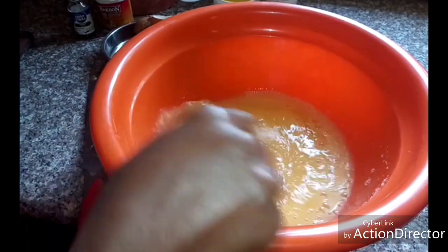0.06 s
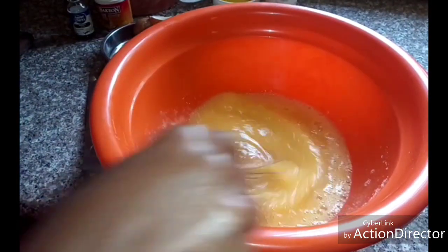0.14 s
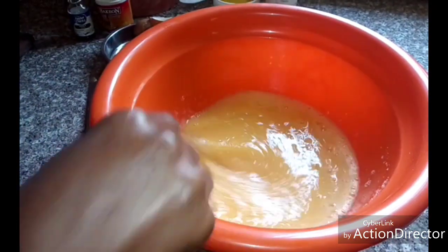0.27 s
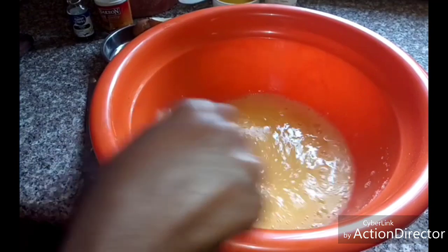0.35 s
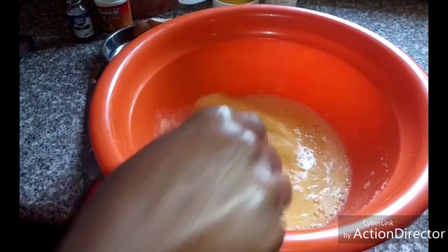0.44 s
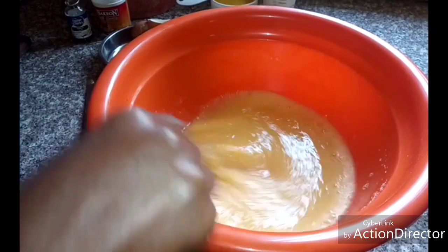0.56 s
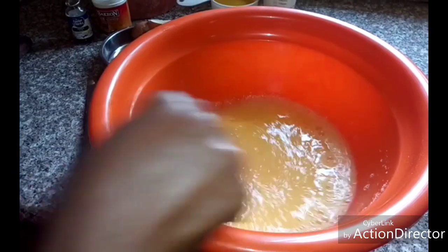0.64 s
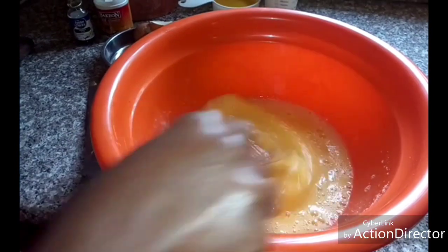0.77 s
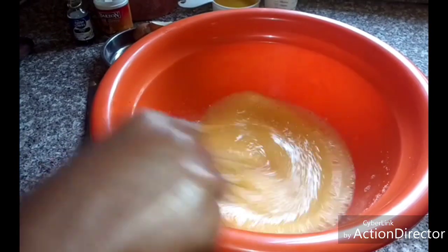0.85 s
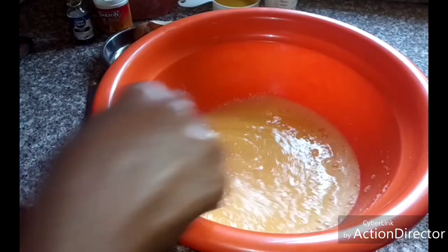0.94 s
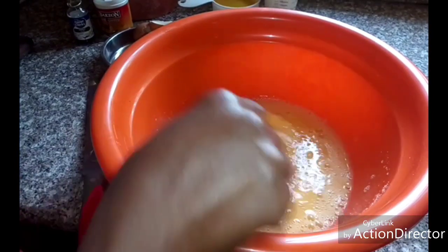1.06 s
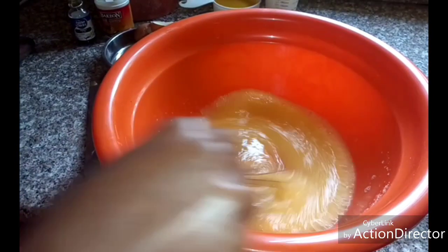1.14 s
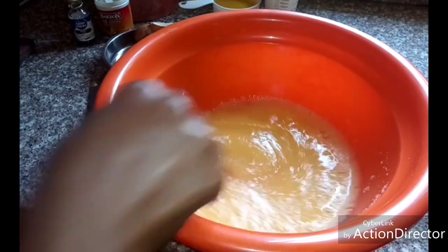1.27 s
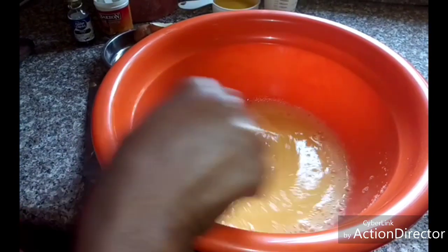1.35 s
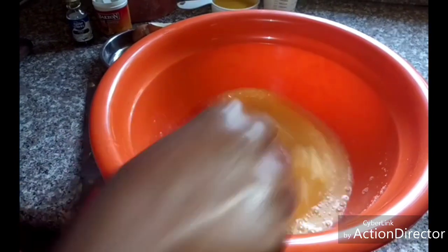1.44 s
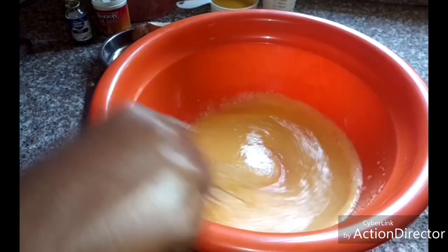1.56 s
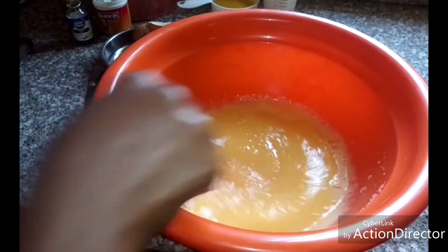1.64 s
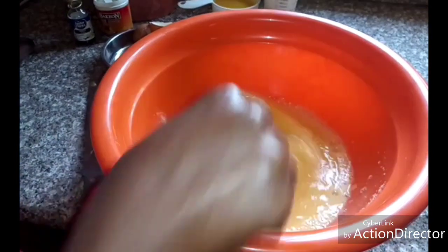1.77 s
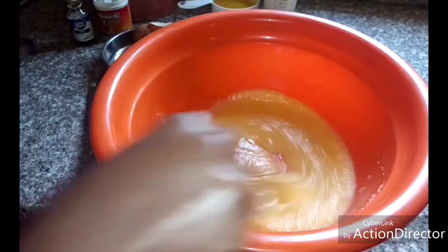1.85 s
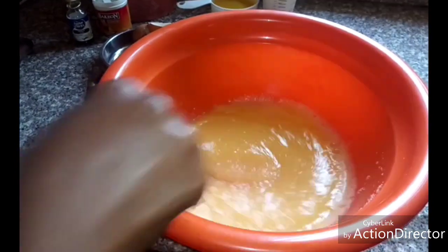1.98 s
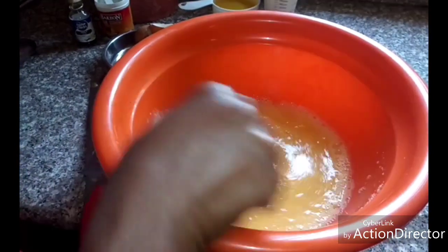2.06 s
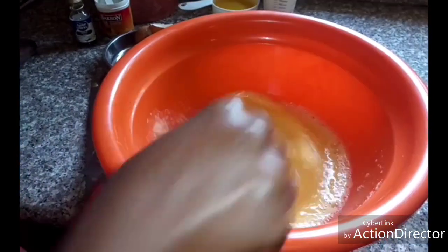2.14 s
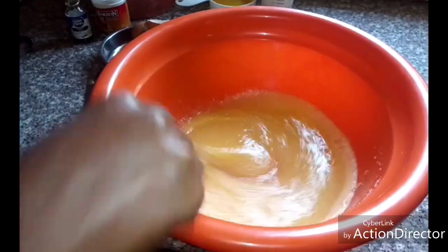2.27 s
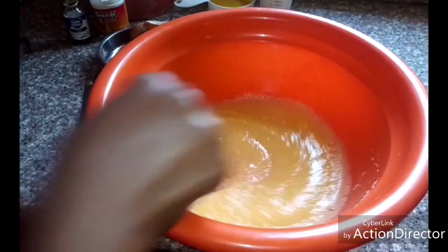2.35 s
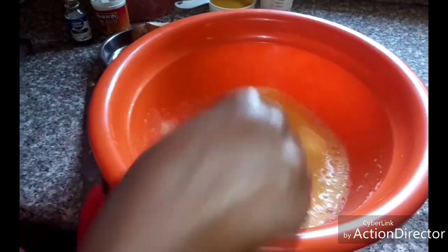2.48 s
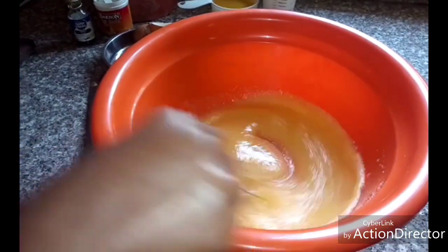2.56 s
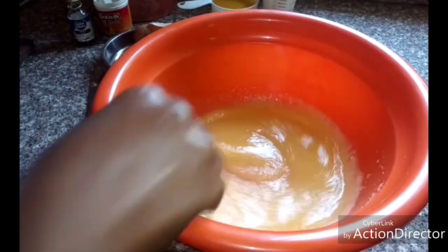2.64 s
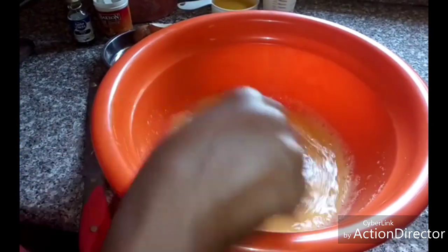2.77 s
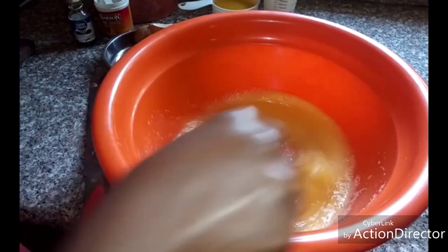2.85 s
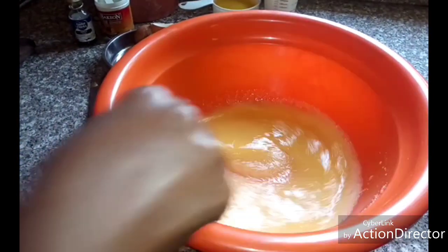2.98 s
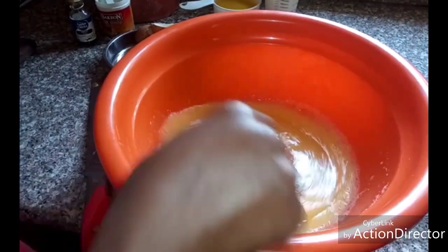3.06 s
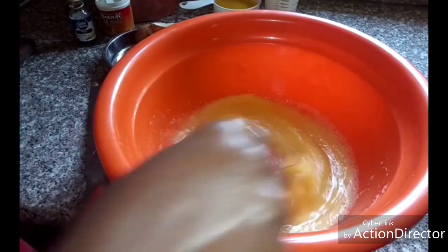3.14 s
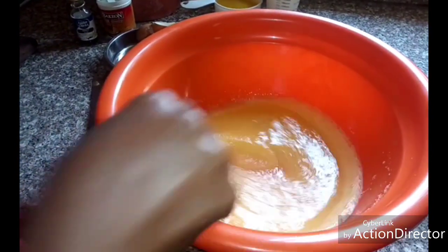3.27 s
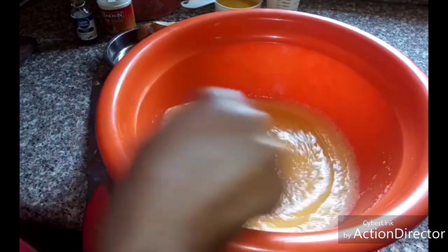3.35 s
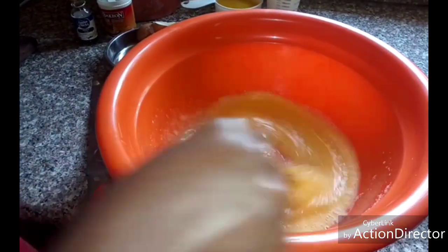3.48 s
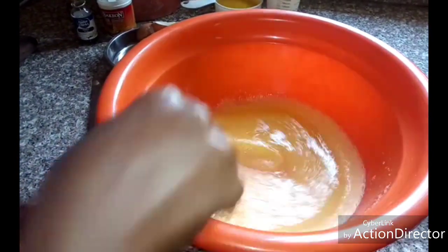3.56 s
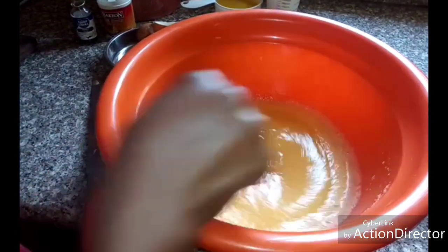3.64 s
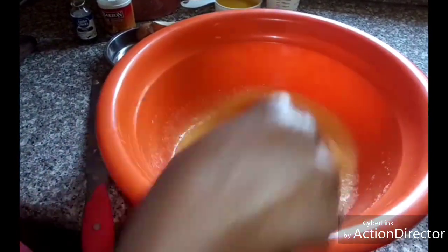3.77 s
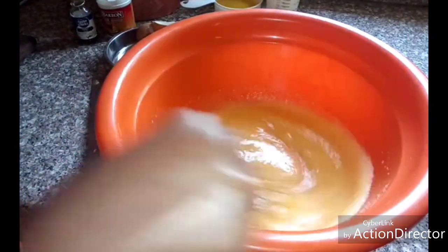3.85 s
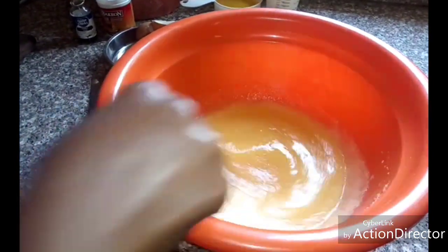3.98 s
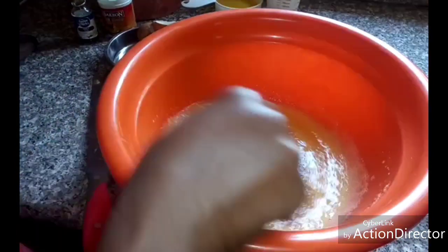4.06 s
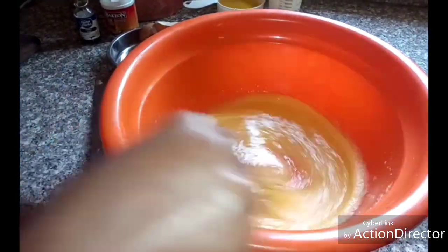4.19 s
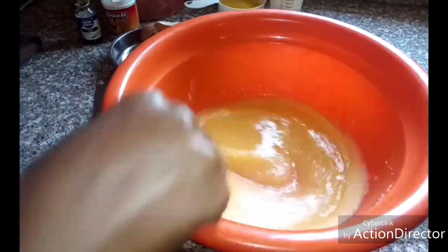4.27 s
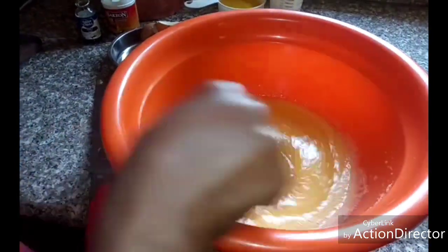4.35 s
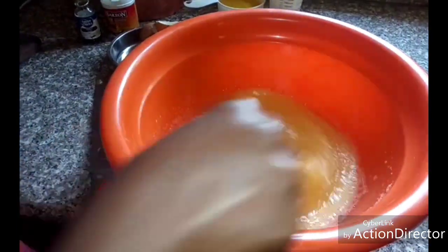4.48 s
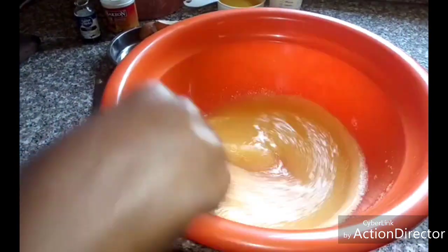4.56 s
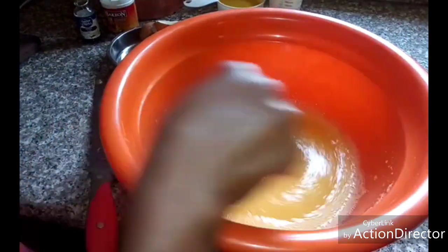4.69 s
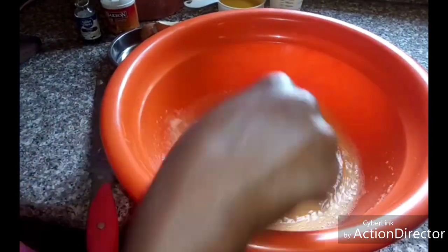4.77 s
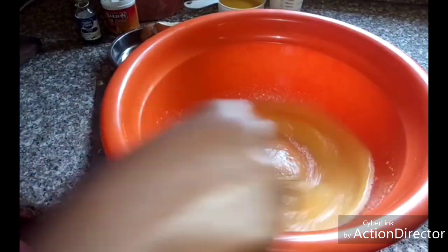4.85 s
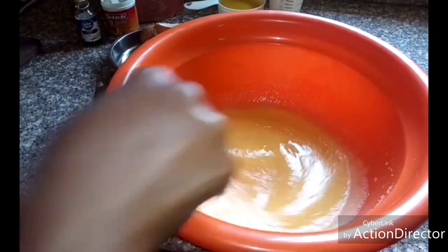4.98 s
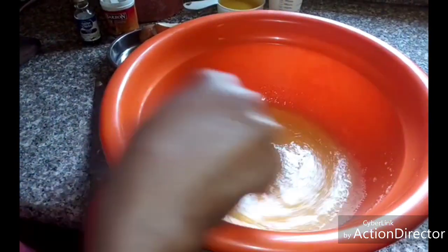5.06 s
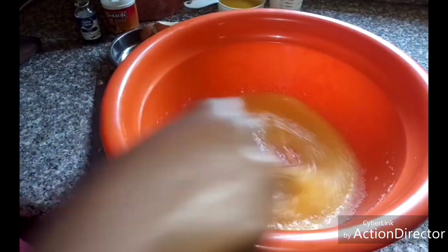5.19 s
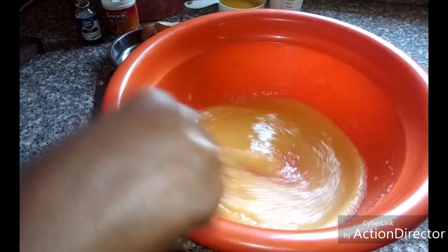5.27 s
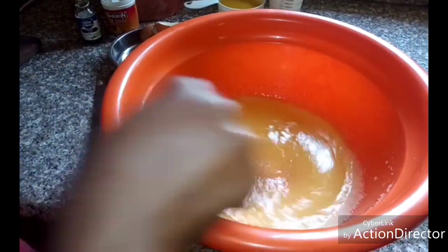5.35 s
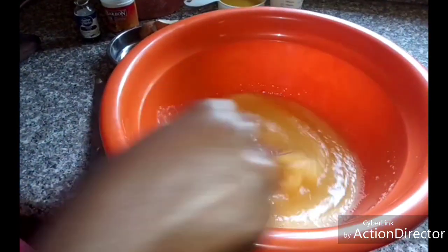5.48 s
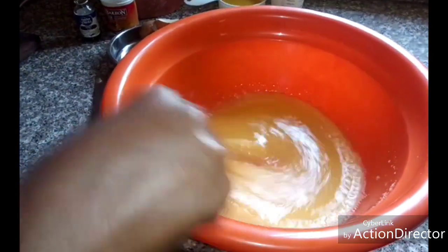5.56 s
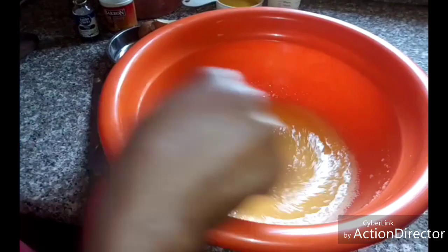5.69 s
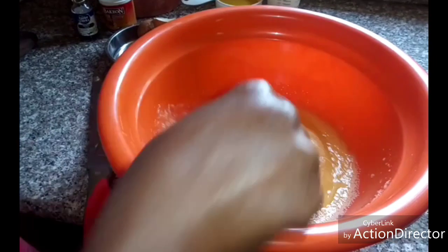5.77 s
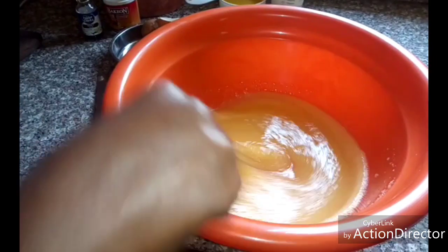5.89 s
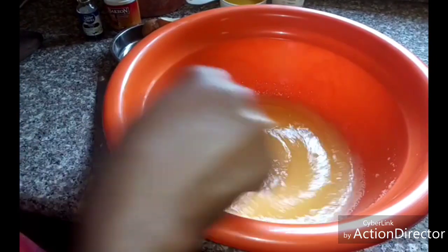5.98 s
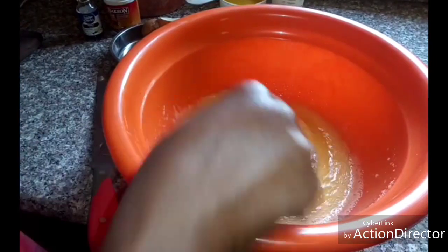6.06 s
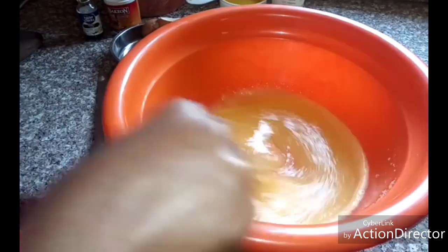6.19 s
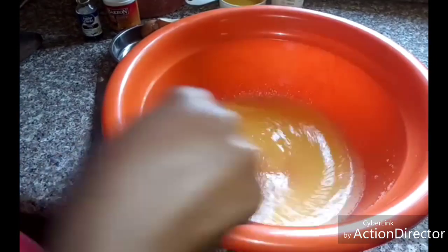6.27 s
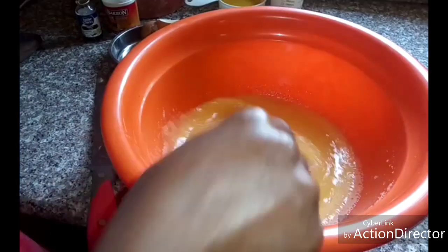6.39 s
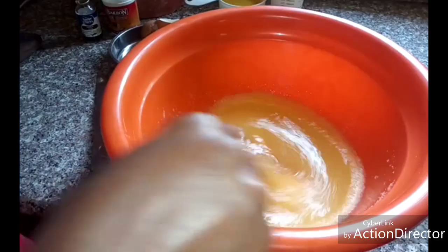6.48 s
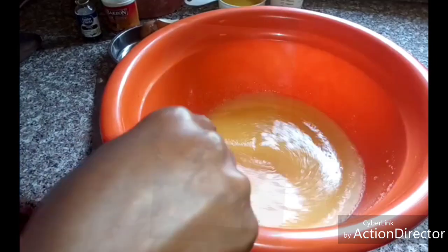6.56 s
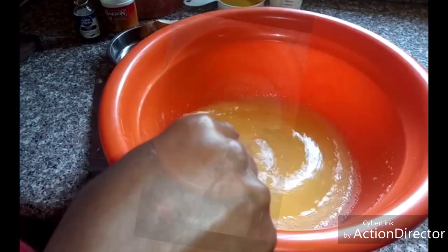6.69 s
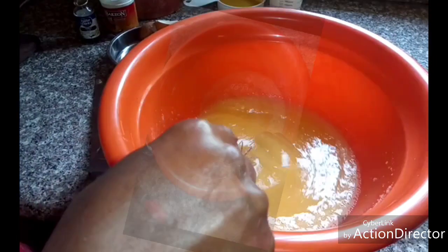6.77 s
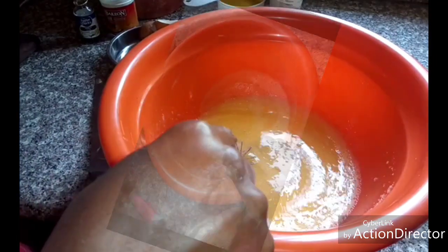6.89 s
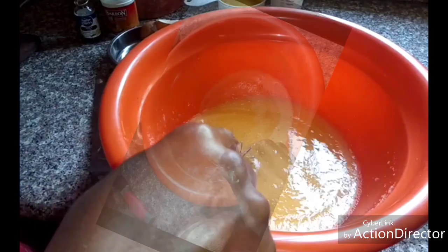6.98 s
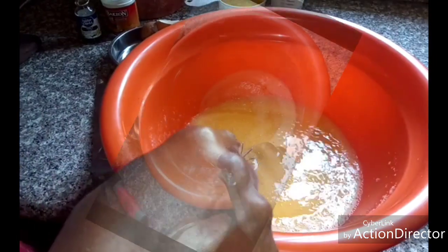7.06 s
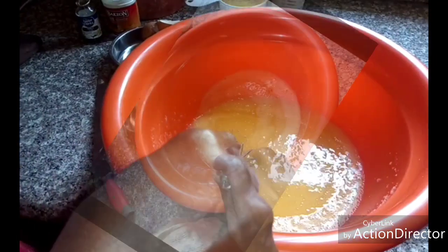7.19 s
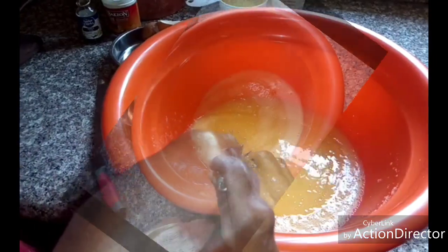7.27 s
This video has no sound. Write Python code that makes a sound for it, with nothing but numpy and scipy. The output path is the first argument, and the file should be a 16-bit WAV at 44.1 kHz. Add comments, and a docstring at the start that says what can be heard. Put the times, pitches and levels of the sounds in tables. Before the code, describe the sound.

Close, dry-sounding whisking in a small kitchen. Wires slap and skid around a plastic bowl in quick uneven rounds, about three per second, with hollow clacks, crunchy sugar rasp, liquid splats and light metallic ticking. The bowl thuds and shuffles on the counter. After more than six seconds it cuts off, and faint birds and a dull stand bump are heard in the hush.

```python
"""Wet knocks of a wire whisk on a plastic bowl, beating eggs and sugar close to a small microphone, then a stop.
Knocks are damped tones, bowl modes and noise bursts; dragged sugar grit is filtered clicks; wires tick in thin treble.
The bowl rocks on a stone counter as low noise; a small kitchen rings behind in feedback delays.
In the quiet after, far birds cheep (gliding narrow bands) and something bumps the microphone's stand (low swings)."""
import sys
import numpy as np
from scipy import signal
from scipy.fft import rfft, irfft, next_fast_len
from scipy.io import wavfile

SR = 44100
rng = np.random.default_rng(int(sys.argv[2]) if len(sys.argv) > 2 else 0)


def log_audio(samples):
    """Write samples as a 16-bit WAV file to the path given in sys.argv[1]."""
    # one column per channel
    frames = np.atleast_2d(samples).T
    # limit to full scale, then quantise
    limited = np.clip(frames, -1, 1)
    pcm = np.round(limited * 32767).astype(np.int16)
    wavfile.write(sys.argv[1], SR, pcm)


def decibels_to_gain(level_db):
    """Convert a level in decibels to a linear amplitude gain (20 dB per decade)."""
    exponent = np.asarray(level_db, float) / 20
    return 10 ** exponent


N = 323253

# whisk on wall: (time [s], relative level [dB], strongest ring [Hz], second ring [Hz], bright crack [dB])
KNOCKS = [(0.003, -27, 4580, 3320, -29.5), (0.0118, -29, 1650.0, 1070, -26), (0.0632, -13, 1780, 3200, -24),
          (0.0924, -13, 1830.0, 2720, -36), (0.1091, -26, 1800, 3170, -47), (0.1167, -19.5, 1770, 830, -28),
          (0.132, -35, 1780, 2700, -32), (0.1732, -30.5, 1153, 2170, -55),
          (0.194, -29.5, 2090, 1200.0, -48.0), (0.2225, -22, 2177, 3230, -31),
          (0.245, -22.5, 3210.0, 2230, -35), (0.282, -27.5, 3670.0, 2400, -20.5),
          (0.3167, -21.5, 1794, 2290, -22), (0.3498, -16, 2080, 1600, -39), (0.3645, -25, 1650, 2180, -23),
          (0.3908, -19, 1970, 2580, -31), (0.3983, -23, 1805, 3120, -21), (0.447, -13.5, 1015, 2780, -18.5),
          (0.5337, -24, 2080.0, 3500, -34), (0.597, -37, 3700, 5500, -26), (0.6428, -25.5, 2150, 3410, -20),
          (0.6527, -45, 4110.0, 3580, -19.5), (0.6896, -20, 1763, 3740, -37),
          (0.7023, -11, 1728, 3220, -52), (0.716, -27, 1815, 1000.0, -43), (0.762, -15.5, 3130, 1710, -26),
          (0.8026, -21, 2120, 2735, -40), (0.8563, -26, 1517, 2670, -47), (0.871, -30, 2190, 3500, -42),
          (0.8856, -23, 2256, 1640, -29), (0.907, -29, 3300, 2210, -30), (0.966, -28, 4790, 2140, -15.5),
          (1.0137, -15.5, 1800, 2094, -42), (1.022, -23, 2800, 1800, -40), (1.04, -13.5, 1914, 1092, -27),
          (1.062, -21.5, 1795, 3510, -46), (1.2053, -21, 4470, 1150.0, -28),
          (1.2398, -19, 1323, 3560.0, -29), (1.315, -21, 3390, 3810, -22), (1.4022, -17, 1957, 4480, -19),
          (1.4356, -24, 1937, 3780, -39.0), (1.4978, -22, 2785, 3840, -38),
          (1.5242, -22, 2160.0, 1532, -40), (1.5359, -21, 2156, 1430, -27),
          (1.6091, -26, 2480.0, 3810, -31), (1.6274, -22, 1655, 1150.0, -19.5),
          (1.6631, -14, 3960, 4770, -16), (1.6749, -14.5, 2150.0, 3263, -54),
          (1.6878, -29, 2240.0, 3610.0, -19), (1.7503, -18, 4440.0, 2800, -28),
          (1.7762, -21, 2650, 1640, -33), (1.786, -13, 3150, 2254, -21), (1.8662, -25, 2230.0, 3487, -35.0),
          (1.9569, -27, 2170.0, 3300, -24), (1.9824, -19.5, 2103, 4480, -28),
          (2.0197, -23, 3830.0, 1053, -23), (2.0608, -13.5, 2120, 2640.0, -34),
          (2.079, -17.5, 2560, 1064, -40), (2.1078, -16.5, 1890, 4430, -15),
          (2.133, -21, 4200.0, 1078, -27), (2.1508, -20, 4570.0, 3170, -16), (2.18, -24, 3110, 2050, -20),
          (2.2118, -26, 3570, 2070, -31), (2.2501, -17.5, 1582, 4180, -24), (2.348, -25.5, 2670, 3900, -19),
          (2.3606, -17.5, 2140, 2765, -18), (2.3962, -19, 4000, 1138, -24),
          (2.4362, -10.5, 2740, 1738, -18.5), (2.5003, -18.5, 3350.0, 2097, -26),
          (2.5488, -22, 2130, 1140, -38), (2.5788, -41, 2200, 3850.0, -23), (2.5923, -22, 2305, 3700, -30),
          (2.6194, -24, 1620, 2240, -26), (2.657, -16.5, 2206, 2766, -15), (2.7008, -22.5, 3310, 2200, -32),
          (2.737, -16, 3380, 1980, -35), (2.7877, -15, 2794, 3330, -17), (2.7987, -24, 2630.0, 3500, -38),
          (2.8115, -35, 3000, 2070, -31), (2.8296, -24, 1896, 3800.0, -47),
          (2.844, -19.5, 3310.0, 2880, -39), (2.8827, -16.5, 1622, 1080, -20),
          (2.966, -17, 3430, 1578, -22.5), (3.036, -26, 2670, 4940, -22), (3.0589, -26.5, 1375, 2010, -39),
          (3.0723, -18, 1745, 3260, -26), (3.0845, -13, 1787, 2400, -32), (3.1041, -17, 1820, 2810, -43),
          (3.137, -24, 1110, 2150.0, -21), (3.1577, -22, 2090, 2700, -23), (3.2004, -19, 2145, 1304, -57),
          (3.2272, -24, 1720, 2310, -35), (3.2513, -28, 1593, 2153, -44.0),
          (3.2885, -16.5, 2680, 3350, -36), (3.3494, -22, 2124, 1305, -40), (3.383, -25.5, 1940, 1213, -48),
          (3.3928, -17.5, 2723, 2276, -23), (3.4067, -17, 1850, 2564, -28), (3.4261, -13, 1956, 2526, -29),
          (3.4394, -35, 2150.0, 1650.0, -30), (3.4867, -22.5, 3550.0, 2270, -33),
          (3.528, -16, 2267, 3650, -27), (3.5983, -31, 1710, 3320, -37), (3.632, -23.5, 3350.0, 1140, -33),
          (3.6488, -29, 2650.0, 4813, -20), (3.664, -27, 1640, 2150.0, -17),
          (3.7012, -20, 2760, 3470.0, -17), (3.7228, -16, 4190, 2660.0, -25),
          (3.742, -19, 3070, 1010, -36.0), (3.7696, -17, 1860.0, 2553, -33.0),
          (3.8137, -23.5, 3260, 1650, -21.5), (3.8368, -20, 2160.0, 1644, -26),
          (3.8937, -26, 3220, 2226, -38), (3.9498, -12, 1680, 2170, -23), (3.9668, -20, 3270.0, 2220, -26),
          (4.0569, -17.5, 1087, 3490, -27), (4.0661, -24, 1050, 3400, -16),
          (4.0916, -19.5, 1910, 1070, -21), (4.1011, -20, 1945, 3870, -27),
          (4.1306, -13.5, 2100, 3250, -16), (4.198, -25, 2150, 3840, -31), (4.2207, -23.5, 2120, 3560, -58),
          (4.2709, -34.5, 2400, 4040, -34), (4.2923, -19.5, 2500.0, 3773, -33),
          (4.409, -19.5, 1752, 970, -32), (4.449, -14.5, 2176, 1330, -41), (4.474, -37, 2260, 1698, -44),
          (4.5449, -19.5, 1745, 3620, -38), (4.57, -24.5, 2300, 1790, -24),
          (4.5911, -21.5, 2230.0, 1280.0, -47), (4.626, -14.5, 2160.0, 1085, -23),
          (4.646, -22, 3180, 2537, -31), (4.6589, -14, 3480, 2783, -33), (4.697, -21, 2460, 2020, -20),
          (4.729, -24.5, 2670, 4717, -17), (4.737, -8.5, 2575, 3270, -38), (4.7602, -16, 2596, 1930, -30),
          (4.7722, -22.5, 3450, 4360.0, -13), (4.855, -22, 1620, 3593, -24), (4.8746, -20, 3490, 2130, -38),
          (4.9365, -23, 2130, 2830, -41), (4.961, -18, 2276, 4150, -19), (4.9727, -17, 1650.0, 2547, -38),
          (5.04, -32.5, 2230, 2670.0, -22), (5.084, -25, 3100, 2610.0, -50),
          (5.1075, -15.5, 3480, 3980, -39), (5.1366, -18.5, 3250, 3807, -23),
          (5.143, -20.5, 2640, 3220, -33), (5.171, -28, 2400, 1725, -38), (5.254, -22, 1084, 3680, -32),
          (5.2771, -34.5, 1075, 1670.0, -27), (5.2995, -24.5, 1580.0, 2102, -41),
          (5.3664, -11.5, 3460.0, 2296, -33), (5.4052, -15, 2720, 1944, -20),
          (5.4274, -16.5, 965, 1482, -49.5), (5.4492, -15.5, 3720, 1510, -29),
          (5.4822, -20, 1985, 2490, -33), (5.5038, -23.5, 2240.0, 3720, -24),
          (5.5578, -25.5, 1600, 2500, -36.0), (5.5901, -17.5, 2087, 1387, -50.0),
          (5.651, -11.5, 1632, 2141, -10.5), (5.716, -19.5, 1573, 3870, -18),
          (5.7273, -15, 1810, 4160, -20), (5.7383, -20.5, 2185, 2746, -19),
          (5.881, -15.5, 4160.0, 1598, -27), (5.8932, -16.5, 1557, 4150, -24),
          (5.906, -24.5, 1625, 2590.0, -34), (5.9432, -24.5, 2170.0, 2619, -47),
          (5.9984, -17.5, 5090, 3454, -13.5), (6.0164, -19.5, 1976, 3200, -23),
          (6.0557, -20.5, 3550.0, 2362, -17.5), (6.069, -23, 1007, 1997, -20),
          (6.0943, -18, 4360, 3554, -36), (6.1156, -15, 2540, 1812, -38), (6.2029, -17, 1400, 2320, -20),
          (6.2304, -21, 1588, 2190, -39), (6.318, -29.5, 2850, 4724, -19.5),
          (6.378, -17.5, 1590, 2190.0, -24), (6.4069, -12.5, 2043, 1460, -15),
          (6.484, -19.5, 2150, 1170.0, -38), (6.5143, -24.5, 1650.0, 2160, -31),
          (6.545, -19, 1460.0, 2160.0, -34), (6.625, -17.5, 1080.0, 2160.0, -57),
          (6.6575, -25, 2276, 1616, -30)]
# jolts of the whole bowl: (time [s], relative level [dB], boom [Hz])
THUDS = [(0.064, -35, 697), (0.125, -38, 413), (0.345, -40, 446), (0.448, -26.5, 784), (0.761, -32, 633),
         (1.017, -39, 419), (1.22, -34, 578), (1.313, -38, 640), (1.629, -30, 638), (1.788, -23.5, 715),
         (1.98, -35, 792), (2.021, -27, 646), (2.253, -30, 616), (2.364, -25, 282), (2.368, -31, 430),
         (2.449, -28.5, 666), (2.596, -30, 614), (2.659, -31.5, 566), (3.035, -36, 637), (3.416, -35, 628),
         (3.533, -33.5, 670), (3.937, -29.5, 731), (4.127, -46, 690), (4.387, -31, 704),
         (4.444, -24.5, 644), (4.659, -24.5, 492.5), (4.735, -30.5, 709), (4.855, -31, 698),
         (4.967, -26, 545), (5.13, -31, 550), (5.278, -27.5, 721), (5.369, -21.5, 512), (5.586, -30, 586),
         (5.651, -20, 764), (5.722, -28.5, 657), (6.012, -31.5, 457), (6.195, -34, 757),
         (6.408, -28.5, 661.5), (6.543, -29, 777), (6.658, -30, 577)]
# plastic bowl modes: (frequency [Hz], relative level [dB], t60 [s])
BOWL_MODES = [(274.6, 2.5, 0.15), (406, -8.5, 0.18), (545.8, -0.5, 0.11), (646, 5.5, 0.057),
              (766, 3, 0.067), (1150, -20, 0.034), (1650, -4.5, 0.068), (2160, 4.5, 0.029),
              (2670, 2, 0.014), (3350, 6.5, 0.0049), (3540, -13, 0.15), (4014, 14, 0.0033),
              (4296, -14, 0.14)]
# spectrum of grit and splat: (frequency [Hz], relative density [dB])
DRAG_COLOUR = [(240, -33), (400, -21), (526, -8.5), (897, -15), (1040, -2), (1420, -7.5), (1680, -2),
               (1950, -2), (2170, -5), (2420, -4), (2630, -4), (2980, -6.5), (3370, -3), (4280, -9),
               (6500, -16), (9000, -21.5), (11700, -54), (19800, -120)]
# spectrum of the wires, with the microphone's top resonance: (frequency [Hz], relative density [dB])
WIRE_COLOUR = [(4120, 0.5), (7000, 5), (8170, -9), (10000, -10.5), (11000, -10), (12100, -17), (13500, -23),
               (14100, -5.5), (14600, -7.5), (15400, 2.5)]
# spectrum of bowl on counter: (frequency [Hz], relative density [dB])
RUMBLE_COLOUR = [(12, -60), (20, -31.5), (54, -15.5), (82, -13.5), (102, -4.5), (150, -3), (189, -8),
                 (268, -3), (300, -19.5), (390, -43.5), (660, -120)]
# spectrum of the background air: (frequency [Hz], relative density [dB])
AIR_COLOUR = [(18, -31.5), (30, -8), (71, 5), (129, -0.5), (283, -4), (490, -11), (918, -11), (2970, -15.5),
              (4630, -14), (5710, -23), (8020, -35), (15400, -34)]
# far birds: (time [s], length [s], start [Hz], end [Hz], width [Hz], level [dB])
CHEEPS = [(6.779, 0.069, 4700, 4810, 45, -63.5), (6.854, 0.13, 5470, 5230, 400, -74),
          (6.878, 0.079, 4960, 4930, 120.5, -65), (6.894, 0.062, 4300, 4360, 250, -67),
          (7.081, 0.11, 6260, 4950, 597, -75), (7.215, 0.14, 5820, 5780, 130, -66)]
# bump of the stand: (time [s], swing level [dB], swing frequency [Hz], rub level [dB])
BUMP = [(6.92, -73, 81.2, -77), (6.928, -57, 77.7, -57), (6.955, -47, 79, -60), (6.972, -28, 89, -73),
        (6.977, -44, 85.7, -56), (7.0, -34, 83, -71), (7.02, -52, 75, -70), (7.04, -67, 70, -90)]
# edges of the noise bands of grit and splat: [Hz]
RASP_EDGES_HZ = [300, 900, 1500, 2400, 3800, 9000]
# loudest ticks of wire on wire: (time [s], relative level [dB], share below 13 kHz [dB])
TICKS = [(0.0034, -36.5, -7), (0.0112, -47, -2), (0.061, -51, 4), (0.092, -46, -0.5), (0.282, -59, 12),
         (0.3168, -24, -22.5), (0.449, -40, -4), (0.6488, -35.5, -12), (0.6907, -44, 2.5),
         (0.7639, -51, 5.5), (0.9644, -39.5, -4.5), (1.0398, -57, 4), (1.205, -51, 0), (1.3156, -42.5, -6),
         (1.403, -49.5, 4), (1.667, -46.5, 3), (1.7852, -42, -1), (1.997, -47, 4), (2.0183, -50, -4),
         (2.0592, -53, -8), (2.079, -46, 0), (2.1494, -51, 7), (2.3462, -47, 3), (2.397, -50.5, 3),
         (2.657, -51.5, 4), (2.7014, -52.5, 3), (2.7366, -45, -7), (2.787, -41, -4), (3.0357, -45, 1.5),
         (3.0594, -46, -7), (3.08, -38.5, -2), (3.3488, -57, 6), (3.392, -48.5, 3), (3.4865, -61, -1),
         (3.649, -27.5, -19), (3.666, -34, -22), (3.764, -39, -13), (3.7896, -51, -3), (3.936, -61, 5),
         (4.0625, -43.5, -10), (4.128, -46.5, 2.5), (4.4094, -60, -1), (4.4444, -52.5, -3),
         (4.6459, -44, 0.5), (4.698, -49.5, 3.5), (4.736, -38, -3.5), (4.7705, -39, -11),
         (4.799, -32, -7.5), (5.0412, -48.5, -0.5), (5.109, -49, -2), (5.3578, -33.5, -1.5),
         (5.405, -50, 3), (5.574, -54.5, 11), (5.643, -31, -9.5), (5.717, -45.5, 8), (5.725, -45, -7),
         (5.9982, -29.5, -9.5), (6.0545, -51, 4.5), (6.0936, -53, 13.5), (6.2014, -56, 6),
         (6.315, -52, -5.5), (6.341, -47, -14), (6.41, -51, 7), (6.656, -52, -4)]
# whisk laps: (forward sweep [s], its grit [dB], grit of sweep back [dB], bowl body re grit [dB], wire rattle [dB])
LAPS = [(0.09, -43, -32.5, -30, -58.5), (0.40, -34, -32.5, -18, -64), (0.71, -59, -40, -17, -64.5),
        (1.03, -49, -35.5, -18, -60), (1.402, -30.5, -29.5, -14, -62), (1.719, -30.5, -26.5, -15.5, -58),
        (2.08, -25.5, -32.5, -11.5, -58.5), (2.386, -20.5, -28, -12, -55.5), (2.79, -20, -26, -27, -54.5),
        (3.094, -22, -25, -13.5, -57), (3.408, -25, -27.5, -25, -58), (3.714, -22.5, -24.5, -10.5, -51),
        (4.118, -25, -29, -15.5, -60.5), (4.446, -19, -31.5, -11.5, -54.5),
        (4.751, -19.5, -32, -15.5, -55.5), (5.132, -25, -26.5, -16, -58), (5.414, -27, -23, -7.5, -57),
        (5.721, -24.5, -37, -31.5, -61), (6.031, -36, -23.5, -8, -59), (6.41, -23.5, -51, -14.5, -70)]
# bowl rocking on the counter: (time [s], rumble level [dB])
ROCKS = [(.13, -53), (.5, -60), (.71, -53), (1.04, -55.5), (1.38, -58), (1.72, -60), (1.85, -47.5),
         (2.11, -47), (2.37, -64), (2.72, -55), (3.41, -64), (3.71, -46.5), (4.13, -55), (4.35, -51.5),
         (4.46, -63), (4.71, -42.5), (5.13, -63), (5.41, -44), (5.69, -66), (6.02, -50.5), (6.22, -54),
         (6.42, -63.5), (6.72, -60)]

BODY_TOP_HZ = 850   # modes below: body; above: wall
KITCHEN_T60_S, WALL_CUT_HZ, KITCHEN_DB = 0.35, 7000, -18.5
BACK_SHARE, STOP_S, STOP_DB_PER_S = 0.48, 6.66, 179   # sweep back, as share of the lap; the hand stops
GRIT_RISE_DB_PER_S, GRIT_FALL_DB_PER_S = 210.5, 116.5
RATTLE_RISE_DB_PER_S, RATTLE_FALL_DB_PER_S, RATTLE_BACK_DB = 262.5, 125.5, -8
SCRAPE_DB, SCRAPE_FALL_DB_PER_S = -8, 272   # each knock skids on along the wall
SHIVER_DB, SHIVER_FALL_DB_PER_S = -32.5, 234.5   # each tick leaves the wires rattling
ROCK_RISE_DB_PER_S, ROCK_FALL_DB_PER_S, SHUFFLE_DB = 225, 168, -72.5
SPLAT_DB_PER_CRACK_DB = 0.32   # a bright knock splashes more
HUM_DB, HUM_FALL_DB_PER_S, HUM_WIDTH_HZ = -19, 422, 266
DULL_LENGTH_DB_PER_DB = -0.1   # a duller knock swells and dies faster
CRACK_IN_WIRES_DB = -20.5   # a bright knock jars the wires
AIR_DB = -66


def knocks():
    """Each knock sums wet rings and hum of the struck spot, bowl modes, a splat and a bright crack."""
    s, level_db, hz, second_hz, crack_db = np.transpose(KNOCKS)
    at = (s * SR).astype(int)
    spot = spot_rings(at, level_db, hz, second_hz, crack_db) + hum(s, level_db, hz)
    modes = bowl(at, level_db - 19.0, level_db - 32.0, hz, lean_db_per_octave=6.5, scatter_db=4.5)
    crack = band_pass(bursts(s, crack_db + 1.5, rise_s=0.00017, t60_s=0.016), 3300, 6800)
    return spot + modes + splat(s, level_db, hz, crack_db) + crack


def spot_rings(at, level_db, hz, second_hz, crack_db):
    """Two damped wet tones of the struck spot, the second weaker."""
    slow_hz = (hz * decibels_to_gain(DULL_LENGTH_DB_PER_DB * (level_db - crack_db)))[:, None]
    first = plops(at, level_db + 9.0, hz, cycles=0.011 * slow_hz, rise_cycles=0.001 * slow_hz,
                  wobble=0.27, climb=0.011)
    pitch_hz = second_hz[:, None]
    second = plops(at, level_db, second_hz, cycles=0.018 * pitch_hz, rise_cycles=0.00097 * pitch_hz,
                   wobble=0.17, climb=0.014)
    return first + second


def hum(s, level_db, hz):
    """The spot struck last hums on, a narrow tone shaken by the skidding wire, dying after each knock."""
    latest = np.maximum(np.searchsorted(s, np.arange(N) / SR) - 1, 0)
    rough = signal.lfilter(*signal.butter(2, HUM_WIDTH_HZ / 2, fs=SR), rng.standard_normal((2, N)))
    phase = 2 * np.pi * np.cumsum(hz[latest]) / SR
    tone = rms_one(rough[0] * np.sin(phase) + rough[1] * np.cos(phase))
    return humps(s + 0.004, level_db + HUM_DB, 3500, HUM_FALL_DB_PER_S) * tone


def splat(s, level_db, hz, crack_db):
    """Egg and grit spurt as noise bursts, strongest in the bands near the spot's pitch."""
    out = 0
    splat_db = level_db - 6.0 + SPLAT_DB_PER_CRACK_DB * (crack_db - level_db)
    for low_hz, high_hz in zip(RASP_EDGES_HZ, RASP_EDGES_HZ[1:-1]):
        away_octaves = np.abs(np.log2(np.sqrt(low_hz * high_hz) / hz))
        noise = bursts(s, splat_db - 1.9 * away_octaves, rise_s=0.0019, t60_s=0.044)
        out = out + band_pass(noise, low_hz, high_hz)
    return coloured(out, DRAG_COLOUR)


def bowl(at, wall_db, body_db, spot_hz, lean_db_per_octave, scatter_db):
    """Contacts strike every mode with random strength and sign; wall modes also depend on the spot's pitch."""
    out, luck = np.zeros(N), rng.standard_normal((len(at), len(BOWL_MODES), 2))
    for k, (hz, mode_db, t60_s) in enumerate(BOWL_MODES):
        if hz < BODY_TOP_HZ:
            reach_db = body_db
        else:
            reach_db = wall_db - lean_db_per_octave * np.abs(np.log2(hz / spot_hz))
        strength = decibels_to_gain(reach_db + mode_db + scatter_db * luck[:, k, 0])
        clicks = np.zeros(N)
        np.add.at(clicks, at, strength * np.sign(luck[:, k, 1]))
        out += ring(clicks, hz, t60_s)
    return out


def stroke():
    """Levels [dB] of grit, bowl body and wire rattle: swells at the sweeps and contacts, sinking at the stop."""
    s, forth_db, back_db, body_db, rattle_db = np.transpose(LAPS)
    back_s, t = s + BACK_SHARE * np.diff(s, append=STOP_S), np.arange(N) / SR
    knock, tick = np.array(KNOCKS), np.array(TICKS)
    sweep_s = np.r_[s, back_s]
    sweep_grit = humps(sweep_s, np.r_[forth_db, back_db], GRIT_RISE_DB_PER_S, GRIT_FALL_DB_PER_S)
    scrape = humps(knock[:, 0], knock[:, 1] + SCRAPE_DB, 2800, SCRAPE_FALL_DB_PER_S)
    sweep_rattle = humps(sweep_s, np.r_[rattle_db, rattle_db + RATTLE_BACK_DB],
                         RATTLE_RISE_DB_PER_S, RATTLE_FALL_DB_PER_S)
    shiver = humps(tick[:, 0], tick[:, 1] + SHIVER_DB, 3000, SHIVER_FALL_DB_PER_S)
    stop_db = STOP_DB_PER_S * np.maximum(t - STOP_S, 0)
    grit_level_db = 20 * np.log10(np.hypot(sweep_grit, scrape) + 1e-9) - stop_db
    rattle_level_db = 20 * np.log10(np.hypot(sweep_rattle, shiver) + 1e-9) - stop_db
    return grit_level_db, grit_level_db + np.interp(t, s, body_db), rattle_level_db


def drag(grit_db, body_db):
    """Grit rasps under the wires in shifting colour, small taps ring the bowl, egg splashes and bubbles."""
    grit = coloured(grains(3500, spread_db=3.5) * clumps(50, depth_db=3), DRAG_COLOUR)
    rasp = sum(clumps(7.2, depth_db=4) * band_pass(grit, low_hz, high_hz)
               for low_hz, high_hz in zip(RASP_EDGES_HZ, RASP_EDGES_HZ[1:]))
    at = np.flatnonzero(rng.random(N) < 450 / SR)   # 450 contacts/s
    luck = rng.random((len(at), 3))
    size_db = -3.5 * np.log(luck[:, 0] + 0.08)
    hz = 825 * 7.03 ** luck[:, 1]
    taps = bowl(at, grit_db[at] - 25 + size_db, body_db[at] - 20 + size_db, hz,
                lean_db_per_octave=-2.5, scatter_db=2.5)
    splash_db = grit_db[at] - 8 - 2.4 * np.log(luck[:, 2] + 0.09)
    splash = plops(at, splash_db, hz, cycles=19.0, rise_cycles=0.72, wobble=0.32, climb=0.051)
    return decibels_to_gain(grit_db - 7) * rasp + taps + splash


def thuds():
    """The whole bowl is jolted and a low wall mode booms as a damped tone."""
    s, level_db, hz = np.transpose(THUDS)
    return plops((s * SR).astype(int), level_db + 4.5, hz, cycles=34.0, rise_cycles=1.0, wobble=0.4, climb=0.009)


def wires(rattle_db):
    """Thin treble noise: ticks with a shiver at touches of wire on wire, a rattle between, jars at knocks."""
    s, tick_db, share_db = np.transpose(TICKS)
    rattle = decibels_to_gain(rattle_db + 8) * grains(7000, spread_db=1.5) * clumps(40, depth_db=6.5)
    knock = np.array(KNOCKS)
    jar = bursts(knock[:, 0], knock[:, -1] + CRACK_IN_WIRES_DB, rise_s=0.0003, t60_s=0.01)
    out = band_pass(jar, 7000, 11500)
    for side, lean_db, rattle_lean_db in (("high", 0, 0), ("low", share_db, -2.5)):
        ticks = bursts(s, tick_db + 9.5 + lean_db, rise_s=0.00014, t60_s=0.018)
        shivers = bursts(s, tick_db - 2.5 + lean_db, rise_s=0.0021, t60_s=0.14)
        split = signal.butter(4, 13000, side, fs=SR, output="sos")
        out = out + signal.sosfilt(split, ticks + shivers + decibels_to_gain(rattle_lean_db) * rattle)
    return coloured(out, WIRE_COLOUR)


def counter():
    """The bowl rocks and shuffles on the stone: lumpy low noise."""
    s, level_db = np.transpose(ROCKS)
    shuffle = decibels_to_gain(SHUFFLE_DB) * (np.arange(N) < STOP_S * SR)
    level = np.hypot(humps(s, level_db, ROCK_RISE_DB_PER_S, ROCK_FALL_DB_PER_S), shuffle)
    return level * coloured(rng.standard_normal(N) * clumps(9.3, depth_db=1.5), RUMBLE_COLOUR)


def bump():
    """The stand swings low with a second harmonic; a dull rub is noise through short rings."""
    swing_db, hz, rub_db = in_time(BUMP)
    t = np.arange(N) / SR
    on = (t > BUMP[0][0]) & (t < BUMP[-1][0])
    phase = 2 * np.pi * np.cumsum(hz * on) / SR
    swing = np.sin(phase) + 0.33 * np.sin(2 * phase + 2.0)
    rub = sum(ring(rng.standard_normal(N), ring_hz, t60_s=0.04) for ring_hz in (1280, 1720, 2050, 2410))
    return on * (decibels_to_gain(swing_db) * swing + decibels_to_gain(rub_db) * rms_one(rub))


def kitchen(x):
    """Ten feedback delays of random length, duller on every round."""
    size = next_fast_len(N + SR)
    turn = np.exp(-2j * np.pi * np.arange(size // 2 + 1) / size)   # one-sample delay
    dull = np.exp(-2 * np.pi * WALL_CUT_HZ / SR)
    wall_loss = (1 - dull) / (1 - dull * turn)
    echo = 0
    for k, lag in enumerate((rng.uniform(.011, .04, 10) * SR).astype(int)):
        delay = np.exp(-2j * np.pi * np.arange(len(turn)) * lag / size)
        loop = decibels_to_gain(-60 * lag / SR / KITCHEN_T60_S) * wall_loss * delay
        echo = echo + (-1) ** k * loop / (1 - loop)
    return irfft(rfft(x, size) * echo, size)[:N]


def birds():
    """Each cheep is a gliding tone blurred to a narrow band by distance and walls."""
    out = np.zeros(N)
    for s, length_s, from_hz, to_hz, width_hz, level_db in CHEEPS:
        i = int(s * SR)
        t = np.linspace(0, 1, min(int(length_s * SR), N - i))
        noise = rng.standard_normal((2, N // 20))
        blur = signal.lfilter(*signal.butter(2, width_hz / 2, fs=SR), noise)[:, -len(t):]
        phase = 2 * np.pi * np.cumsum(from_hz + (to_hz - from_hz) * t) / SR
        tone = rms_one(blur[0] * np.sin(phase) + blur[1] * np.cos(phase))
        out[i:i + len(t)] += decibels_to_gain(level_db) * np.sqrt(np.sin(np.pi * t ** 0.54)) * tone
    return out


def air():
    """Steady background air: coloured noise."""
    return decibels_to_gain(AIR_DB) * coloured(rng.standard_normal(N), AIR_COLOUR)


def plops(at, level_db, hz, cycles, rise_cycles, wobble, climb):
    """Short damped tones: swell, waver, climb in pitch like a bubble, fall 60 dB in the given cycles."""
    length = 1600
    turns = hz[:, None] * np.arange(length) / SR
    waver = signal.lfilter([1], [1, -.97], rng.standard_normal((len(at), length)), axis=1) / 4
    fade = np.hanning(2 * length)[length:] ** .5
    shape = (1 - np.exp(-turns / rise_cycles)) ** 2 * decibels_to_gain(-60 * turns / cycles) * (1 + wobble * waver) * fade
    # reversed rows: each plop's phase takes another one's waver
    tone = np.sin(2 * np.pi * turns * (1 + climb * turns / cycles) + wobble * waver[::-1])
    out = np.zeros(N + length)
    np.add.at(out, at[:, None] + np.arange(length), decibels_to_gain(level_db)[:, None] * shape * tone)
    return out[:N]


def bursts(s, level_db, rise_s, t60_s):
    """Noise that flares at each contact and dies exponentially."""
    starts = np.zeros(N)
    np.add.at(starts, (s * SR).astype(int), decibels_to_gain(level_db))
    fall, rise = decibels_to_gain(-60 / (t60_s * SR)), np.exp(-1 / (max(rise_s, 1e-5) * SR))
    decay = signal.lfilter([1], [1, -fall], starts)
    return signal.lfilter([1 - rise], [1, -rise], decay) * rng.standard_normal(N)


def ring(clicks, hz, t60_s):
    """Two-pole resonator: a unit click sets a sine of height 1 ringing."""
    r, w = decibels_to_gain(-60 / (t60_s * SR)), 2 * np.pi * hz / SR
    return signal.lfilter([0, np.sin(w)], [1, -2 * r * np.cos(w), r * r], clicks + 1e-18)


def grains(per_s, spread_db):
    """Random clicks of uneven size and sign; rms 1."""
    sizes = decibels_to_gain(spread_db * np.minimum(rng.exponential(1, N), 5)) * rng.choice([-1, 1], N)
    return rms_one(sizes * (rng.random(N) < per_s / SR))


def clumps(rate_hz, depth_db):
    """Randomly wavering gain of rms 1, as contacts come in bunches."""
    r = np.exp(-2 * np.pi * rate_hz / SR)
    smooth = signal.lfilter([.02], [1, -.98], rng.standard_normal(N))
    lumpy = rms_one(signal.lfilter([1], [1, -r], smooth))
    return rms_one(decibels_to_gain(depth_db * np.minimum(lumpy, 1.8)))


def humps(s, peak_db, rise_db_per_s, fall_db_per_s):
    """Gain of swells that climb to peaks and sink at steady dB rates, added in power."""
    grid = np.arange(0, N, 100)
    late_s = grid / SR - np.asarray(s)[:, None]
    slope_db = np.where(late_s < 0, rise_db_per_s * late_s, -fall_db_per_s * late_s)
    power = decibels_to_gain(2 * (np.asarray(peak_db)[:, None] + slope_db)).sum(axis=0)
    return np.interp(np.arange(N), grid, np.sqrt(power))


def coloured(x, points):
    """Minimum-phase filter of a spectrum, keeping the power of white input."""
    hz, level_db = np.transpose(points)
    grid_hz = np.maximum(np.fft.rfftfreq(8192, 1 / SR), 1)
    cepstrum = irfft(np.log(decibels_to_gain(np.interp(np.log(grid_hz), np.log(hz), level_db))))
    cepstrum[1:4096] *= 2   # fold to causal
    cepstrum[4097:] = 0
    response = irfft(np.exp(rfft(cepstrum)))
    return signal.fftconvolve(x, response / np.sqrt(np.sum(response ** 2)))[:N]


def band_pass(x, low_hz, high_hz):
    """Butterworth band."""
    return signal.sosfilt(signal.butter(2, [low_hz, high_hz], "band", fs=SR, output="sos"), x)


def high_pass(x, hz, order):
    """Butterworth low cut."""
    return signal.sosfilt(signal.butter(order, hz, "high", fs=SR, output="sos"), x)


def in_time(rows):
    """Columns of a curve at every sample."""
    s, *columns = np.transpose(rows)
    return [np.interp(np.arange(N) / SR, s, c) for c in columns]


def rms_one(x):
    """Scale to rms 1."""
    return x / np.sqrt(np.mean(x ** 2) + 1e-20)


def scene():
    """Whisk and bowl, their kitchen echo, counter, birds, bump and air; one channel."""
    grit_db, body_db, rattle_db = stroke()
    wall = high_pass(knocks() + drag(grit_db, body_db), 400, order=4)   # a small bowl radiates no bass
    wall = wall + high_pass(thuds(), 210, order=3)
    # steep low-pass at 8.3 kHz: the microphone dulls knocks and grit; wire ticks added after
    wall = signal.sosfilt(signal.cheby2(6, 40, 8300, fs=SR, output="sos"), wall)
    whisk = wall + wires(rattle_db)
    far = birds()
    echoes = decibels_to_gain(KITCHEN_DB) * kitchen(whisk) + decibels_to_gain(-7.5) * kitchen(far)
    return (whisk + echoes + counter() + far + bump() + air())[None]


def top_cut(x):
    """Nothing passes above the cut-off."""
    return signal.sosfilt(signal.butter(12, 16810, fs=SR, output="sos"), x)


def record(dry):
    """Steep low-pass at 15.5 kHz on the mix."""
    cut = signal.sosfilt(signal.ellip(8, .5, 42, 15500, fs=SR, output="sos"), dry)
    return top_cut(cut)


dry = scene()
out = record(dry)
log_audio(out)
```